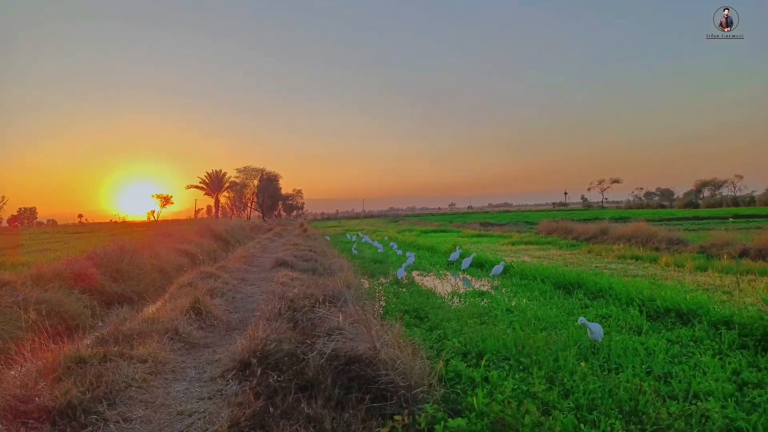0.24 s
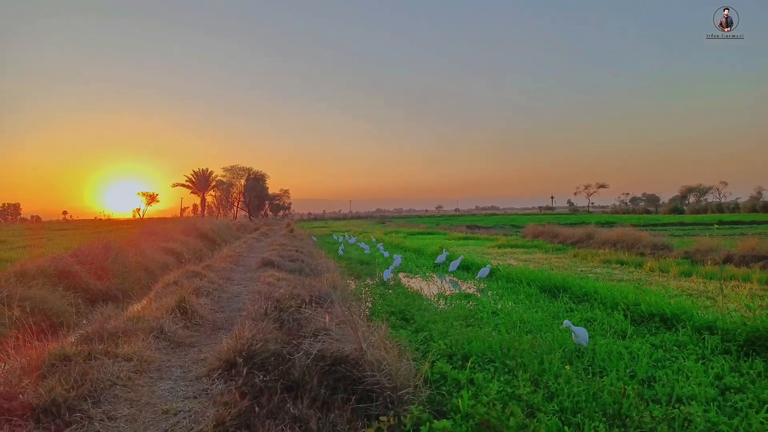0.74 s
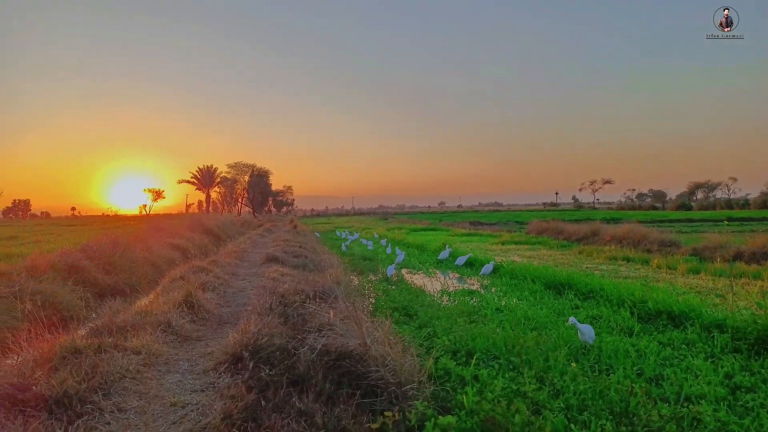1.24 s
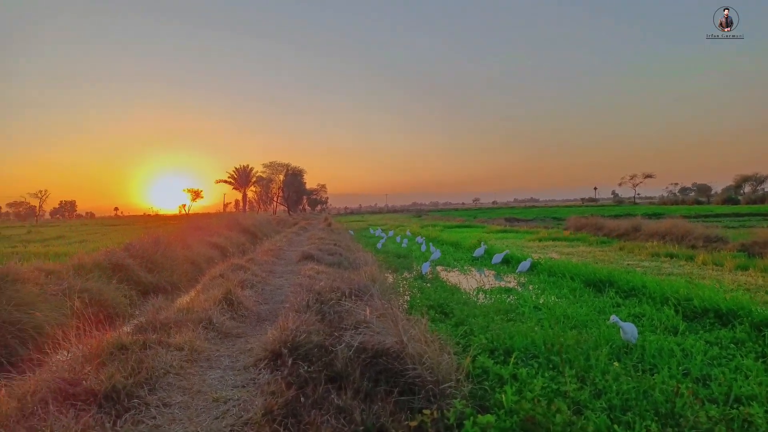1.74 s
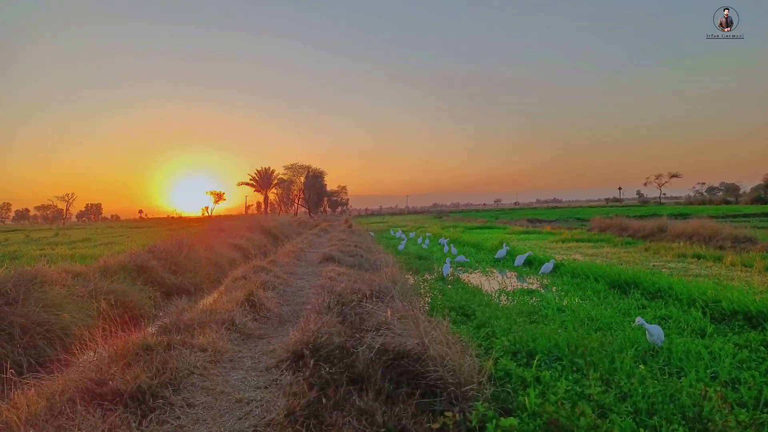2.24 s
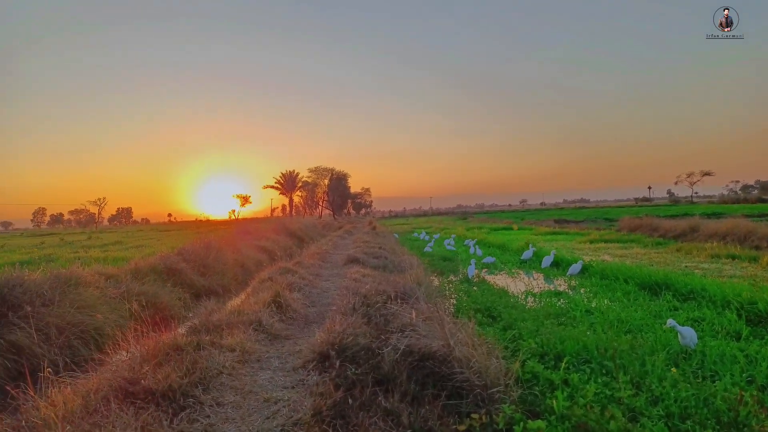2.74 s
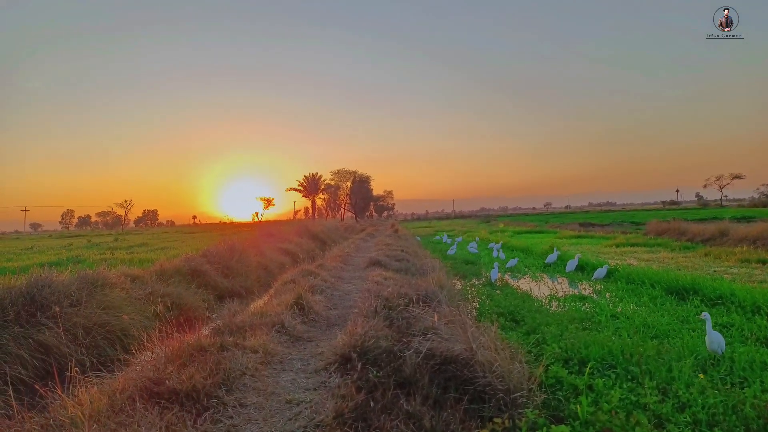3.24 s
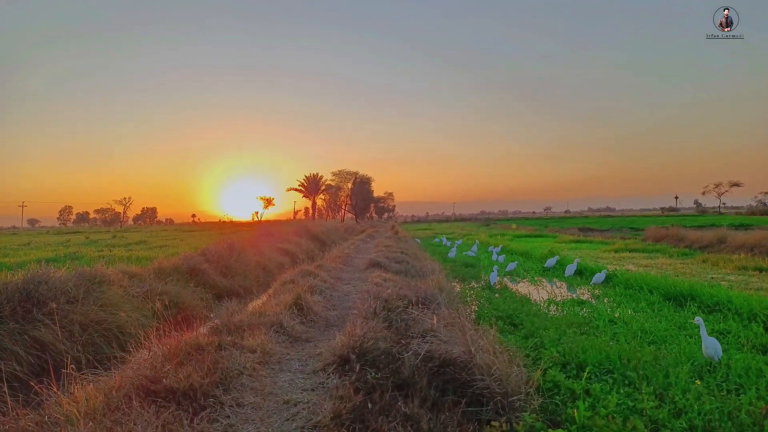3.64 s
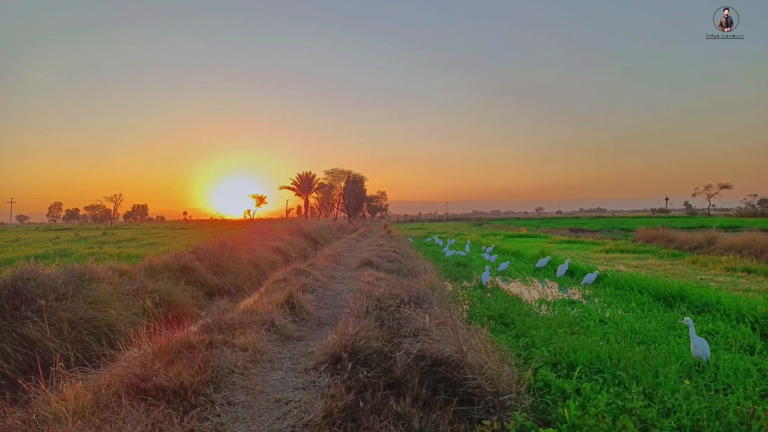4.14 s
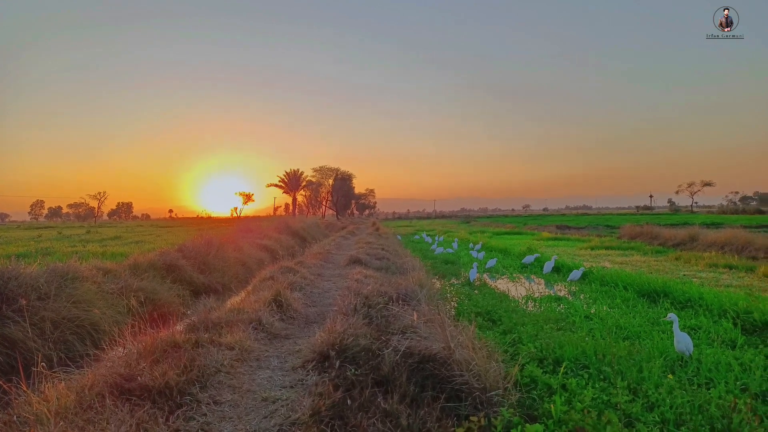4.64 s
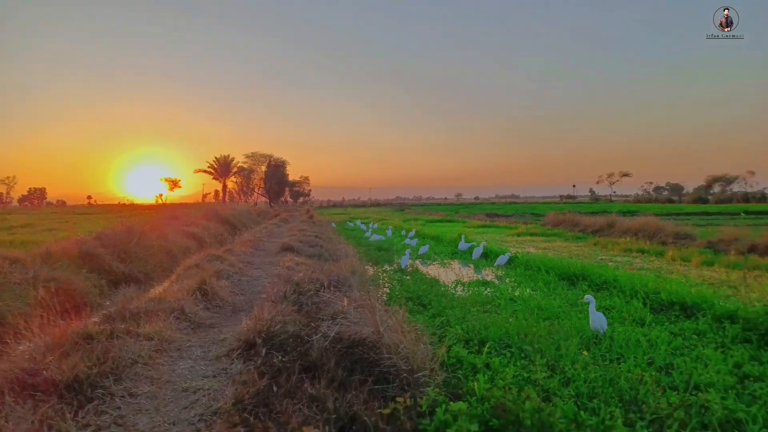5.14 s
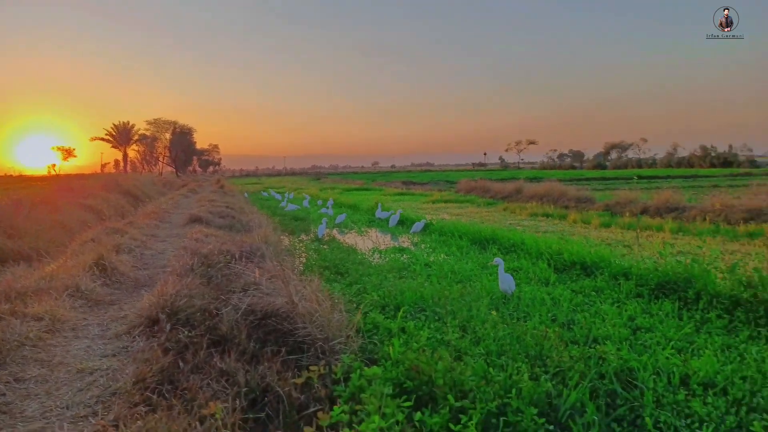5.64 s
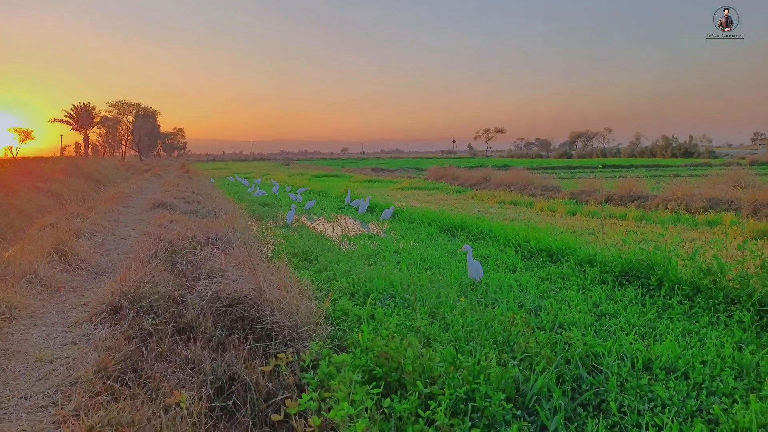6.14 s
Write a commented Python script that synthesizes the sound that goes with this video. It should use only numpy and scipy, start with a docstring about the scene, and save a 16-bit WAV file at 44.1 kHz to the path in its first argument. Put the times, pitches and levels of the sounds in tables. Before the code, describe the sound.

A single-cylinder diesel engine runs a water pump in open fields for about six and a half seconds, firing just under eight times a second. Each beat is a sharp, ringing exhaust chuff with a soft low thud and a short scatter off the ground. Loose metal rattles lightly in between. At about 1.1 seconds all sound drops out for an instant. Around 1.4 seconds the engine misfires once, comes back with a harder beat and a few small clanks, slows slightly and recovers by about 2.5 seconds. Throughout, a slightly faster engine thumps dully farther off, drifting in and out of step with the main beat, over a very faint outdoor rumble. From about 5.4 seconds a soft hiss with thin, high whistles rises between the beats, strongest near 5.8 seconds, while both engines keep going to the end.

```python
"""Open fields, where a single-cylinder diesel drives a water pump at just under eight firings a second.
Each firing is a sharp, ringing exhaust chuff with a short scatter off the ground and a low thud;
loose metal rattles in between. The recorder drops out for an instant, then the engine misfires once,
sags a little and picks up. A slightly faster engine thumps farther off, drifting through the beat.
Near the end a thin, whistling hiss comes up."""
import sys
import numpy as np
from scipy import signal
from scipy.fft import rfft, irfft
from scipy.io import wavfile

SR = 44100
rng = np.random.default_rng(int(sys.argv[2]) if len(sys.argv) > 2 else 0)


def store_wav(level_fs):
    """Save 16-bit WAV to argv[1]."""
    pcm = np.round(np.clip(np.atleast_2d(level_fs), -1, 1) * 32767)
    wavfile.write(sys.argv[1], SR, pcm.T.astype(np.int16))


N = 280917
TIME = np.arange(N) / SR
LEAD_S = .03  # a stroke's sound starts this long before its centre
AGE = np.arange(int(SR / 6)) / SR - LEAD_S  # seconds from the centre of a stroke
FREQ = np.abs(np.fft.fftfreq(4096, 1 / SR)) + 1
RUNNING = (TIME < 1.127) | (TIME > 1.1425)  # false while the recorder stalls

# Modes of the silencer and casing. Each row: pitch in Hz, relative level in dB, T60 in seconds.
CASING_MODES = [(1180, -28.5, 0.025), (1410, -9, 0.25), (1770, 1.5, 0.09), (1765, 6.5, 0.26),
                (1970, -2, 0.39), (2584, 1.5, 0.16), (3130, 4.5, 0.32), (3850, -8, 0.17), (5700, -4, 0.18),
                (6440, -18.5, 0.2), (7730, -28.5, 0.049), (8350, -38, 0.013)]


def pump_engine():
    """A chuff and a thud per firing; each chuff sits a little differently between left and right."""
    # Governed speed. Each row: time in seconds, firings per second.
    speed = [(0, 7.811), (1, 7.799), (1.4, 7.706), (2.4, 7.801), (4.3, 7.906), (5.2, 7.812), (6.37, 7.785)]
    # Drift of the exhaust note. Each row: time in seconds, level in dB, strongest ring in Hz,
    # extra body below 2 kHz in dB, extra edge above 4 kHz in dB.
    exhaust_note = [(0, -34, 2740, 19.5, 8.5), (.5, -34.5, 2650, 6.5, 2), (1.051, -33, 2740, 9, 6.5),
                    (2.002, -30, 2655, 6, 2), (2.5, -32.5, 2770, 5.5, 1.5), (3.148, -29, 2527, 5, -2),
                    (3.95, -28.5, 2546, 6, -3), (4.35, -32, 2640, 15, 0), (4.8, -33, 2620, 5.5, -2.5),
                    (5.1, -32, 2790, 0.5, 7), (5.5, -30, 2220, 8.5, 2.5), (6.37, -31.5, 2230, -0.5, 0)]
    # Hard and soft firings, one a misfire. Each row: time in seconds, accent in dB.
    odd_firings = [(.06, 7.5), (.32, 1.5), (.83, -4.5), (1.36, -24.5), (1.49, 8.5), (1.62, -4), (1.75, 2),
                   (2.01, 4), (2.27, 2.5), (4.18, 4), (4.56, 5.5), (4.94, -8), (5.2, 2.5), (5.33, -6),
                   (5.84, -6), (5.97, 2), (6.22, -6)]
    out = np.zeros((2, N))
    times, *drift = np.transpose(exhaust_note)
    for s in firings(speed, first_s=.0647):
        db, ring_hz, body_db, edge_db = (np.interp(s, times, column) for column in drift)
        chance = rng.standard_normal(7)  # no two firings burn alike
        extra_db = accent(s, odd_firings) + 1.32 * chance[0]
        db = db + extra_db
        exhaust = chuff(db, ring_hz * (1 + .029 * chance[1]),
                        body_db + 2 * chance[2], edge_db + 2 * chance[3],
                        spread_ms=2.185 * np.exp(.26 * chance[4] - .015 * extra_db),  # harder is shorter
                        tail_db=-39.5 + .6 * db + 4.5 * chance[5])  # partly follows the burst
        add(out, s, delay_left(exhaust, lag_ms=.12 + .05 * chance[6]))
        add(out, s, delay_left([thud()] * 2, lag_ms=.21))
    return out


def chuff(db, ring_hz, body_db, edge_db, spread_ms, tail_db):
    """Gas bursts from the exhaust in ragged spurts, rings the metal and scatters off banks and crops."""
    # Tone of the exhaust burst. Each row: frequency in Hz, gain in dB.
    burst_eq = [(450, -56), (900, -33), (1100, -33), (1300, -12), (1550, -24.5), (1750, -1.5), (2620, 4.5),
                (3950, -0.5), (4350, -5.5), (4850, -2.5), (6000, -12), (6900, -28), (8400, -48),
                (9200, -67)]
    # Tone of the ground echoes. Each row: frequency in Hz, gain in dB.
    ground_eq = [(450, -30), (900, -19), (1300, -14), (1800, 4), (2200, -3.5), (2600, 9), (3000, -8),
                 (3900, -0.5), (5500, -16), (6500, -20), (8000, -41), (9000, -67.5)]
    progress = 1000 * AGE / spread_ms
    valve = np.where(progress > -2.1, 1, .3)  # a faint leak, then it cracks open
    gust = valve * (np.exp(-(progress / 2.2) ** 2) + .13 * swell(rise_s=.0042, fall_s=.0052))
    gas = noise(apart=.017) * gust * undb(2 * walk(rate=2200, size=len(AGE)))
    shelves = np.interp(FREQ, [1900, 2400, 3800, 4500], [body_db, 0, 0, edge_db])
    # One strong ring, with random peaks and notches that change at each chuff.
    peaks = 8 / (1 + ((FREQ - ring_hz) / 110) ** 2) + 3.4 * ripple(step_hz=170)
    burst = level(colour(gas, spectrum(burst_eq) + shelves + peaks), db, span_s=.0075)
    metal = level(casing_ring(gas), tail_db - 1, span_s=.03)
    # Nearby ground returns grainy echoes within about 50 ms.
    cutoff = 1 / (1 + np.exp((AGE - .046) / .0027))
    echoes = noise(apart=.88) * swell(rise_s=.0056, fall_s=.048) * cutoff
    echoes *= undb(3.5 * walk(rate=300, size=len(AGE)))
    ground = spectrum(ground_eq) + 3 * ripple(step_hz=220)
    return burst + metal + level(colour(echoes, ground), tail_db + 1, span_s=.05)


def casing_ring(push, scatter_db=4, detune=.012):
    """The metal rings in its modes, struck a little differently each time."""
    hz, db, t60 = np.transpose(CASING_MODES)[:, :, None]
    chance = rng.standard_normal((2, len(hz), 1))
    modes = undb(db + scatter_db * chance[0]) * mode(hz * (1 + detune * chance[1]), t60)
    return ring(push, modes.sum(axis=0))


def thud():
    """The firing kicks the block, the exhaust slug follows, and the valve gear knocks just after."""
    chance = rng.standard_normal(6)
    kick = undb(-56.5 + 1.3 * chance[0]) * throb(235 * (1 + .033 * chance[1]), .002, delay_s=-.0036)
    slug = undb(-60 + .45 * chance[2]) * throb(hz=82, width_s=.011, delay_s=.0096)
    knock_s = .037 + .0022 * chance[5]
    knock = undb(-63 + 2 * chance[3]) * throb(262 * (1 + .06 * chance[4]), .0053, knock_s)
    return kick + slug + knock


def rattle(taps_per_s=70, scatter_db=8):
    """Shaken metal: small random taps on each casing mode, and a few louder clanks and knocks."""
    # Clanks and knocks. Each row: time in seconds, pitch in Hz, level in dB. Most are loose parts; the one at
    # 1.403 s is a louder clack of the far engine, the one at 4.095 s a late knock of the near engine's valve.
    clanks = [(1.403, 2510, -53.5), (1.444, 1670, -55), (1.49, 1077, -48), (1.949, 1750, -50),
              (2.168, 2630, -52.5), (2.462, 1630, -59.5), (2.562, 1650, -58.5), (4.095, 1650, -57.5)]
    out = np.zeros((2, N))
    for hz, db, _ in CASING_MODES:
        taps = (rng.random((2, N)) < taps_per_s / SR) * undb(scatter_db * rng.standard_normal(N))
        out += undb(db) * ring(taps, mode(hz, t60=.036))
    out = level(out, db=-73, span_s=N / SR)
    for s, hz, db in clanks:
        add(out, s, clank(hz, db))
    return out


def clank(hz, db):
    """A loose part touches down softly, chatters and rings for a moment."""
    chatter = 1 + 1.5 * walk(rate=1400, size=len(AGE))
    tap = np.exp(-(AGE / .003) ** 2) * np.cos(2 * np.pi * hz * AGE) * chatter
    return level(ring(tap, mode(hz, t60=.061))[0], db, span_s=.015)


def far_engine(clack_lead_s=.007):
    """Distance leaves a dull clack with the deep thump of the exhaust just behind it."""
    # Engine speed. Each row: time in seconds, firings per second.
    speed = [(0, 9.254), (1.5, 9.148), (3.8, 9.134), (5.4, 8.975), (6.37, 9.037)]
    # Heavy strokes. Each row: time in seconds, extra thump in dB.
    heavy_thumps = [(.21, 9.5), (1.63, 6), (2.29, 3.5), (3.71, 5), (5.48, 6), (5.59, 6), (6.26, 3.5)]
    # Tone of the clack. Each row: frequency in Hz, gain in dB.
    clack_eq = [(450, -25.5), (900, -10), (1150, -10.5), (1500, 9), (1900, 8.5), (2150, -19), (2550, 8.5),
                (2900, -10.5), (3750, -10), (4300, -15), (7000, -22), (8200, -63)]
    out = np.zeros((2, N))
    for s in firings(speed, first_s=.0934):
        chance = rng.standard_normal(3)
        thump_db = -53 + accent(s, heavy_thumps) + .44 * chance[1]
        thump = throb(hz=90 * (1 + .068 * chance[0]), width_s=.0071)
        thump -= .29 * throb(hz=152.6, width_s=.0096)  # the pipe's second resonance sharpens the crests
        add(out, s, delay_left([undb(thump_db) * thump] * 2, lag_ms=.3))
        push = noise(apart=.57) * swell(rise_s=.002, fall_s=.0055)
        tone = spectrum(clack_eq) + 4 * ripple(step_hz=200)
        clack = level(colour(push, tone), db=-56.5 + 2.5 * chance[2], span_s=.012)
        add(out, s - clack_lead_s, delay_left(clack, lag_ms=.15))
    return out


def whistling_hiss():
    """A soft hiss with thin, mostly sinking whistles fills the gaps between the last beats."""
    # Tone of the hiss. Each row: frequency in Hz, gain in dB.
    hiss_eq = [(1200, -21.5), (1800, 1.5), (2150, 10.5), (2700, -20), (3350, -3), (3900, -4), (4400, -5),
               (4900, -20.5), (5400, -8), (6200, -20.5), (7100, -19.5), (8500, -42.5), (15000, -50)]
    # Its fader curve. Each row: time in seconds, level in dB.
    fader = [(0, -90.5), (2.4, -107.5), (3.4, -94), (4.5, -89), (5.3, -84.5), (5.45, -73.5), (5.8, -59.5),
             (6.05, -63.5), (6.37, -69.5)]
    # Whistles. Each row: start and end in seconds, first and last pitch in Hz, relative level in dB.
    whistles = [(5.4, 5.721, 5400, 5300, -56), (5.449, 5.832, 3240, 3460, -60),
                (5.515, 5.794, 2240, 2050, -74), (5.677, 6.067, 6250, 6300, -73),
                (5.744, 6.369, 2200, 1967, -64), (5.996, 6.318, 6230, 6150, -60.5),
                (5.957, 6.316, 3670, 3400, -71)]
    out = level(colour(noise(apart=.82, size=N), spectrum(hiss_eq)), db=0, span_s=N / SR)
    out *= undb(np.interp(TIME, *np.transpose(fader)) + 4.3 * walk(rate=19))
    for start, end, from_hz, to_hz, db in whistles:
        along = np.clip((TIME - start) / (end - start), 0, 1)
        phase = 2 * np.pi * np.cumsum(from_hz + (to_hz - from_hz) * along) / SR
        arch = np.sqrt(np.abs(np.sin(np.pi * along)))
        # An unsteady tone, a couple of hundred hertz wide.
        tone = np.array([walk(260) * np.cos(phase) + walk(260) * np.sin(phase) for _ in range(2)])
        out += undb(db) * arch * tone / 2.5
    return out


def field_air():
    """Low rumble, alike on both sides, under a faint wavering wash from the open land."""
    # Tone of the ambience. Each row: frequency in Hz, gain in dB.
    air_eq = [(25, -16.5), (70, -7.5), (110, 8.5), (200, -5.5), (270, -3), (430, -29), (750, -10.5),
              (1100, -14), (1750, -15.5), (2200, -29), (3400, -21), (6000, -34), (8500, -47), (15000, -35)]
    rumble = signal.sosfilt(signal.butter(2, 450, fs=SR, output="sos"), noise(apart=.056, size=N))
    wash = signal.sosfilt(signal.butter(2, 450, "high", fs=SR, output="sos"), noise(apart=1, size=N))
    air = rumble * undb(4 * walk(rate=17)) + wash * undb(2 * walk(rate=15))
    return level(colour(air, spectrum(air_eq)), db=-70.5, span_s=N / SR)


def firings(speed, first_s):
    """Times at which an engine completes each cycle; the count pauses during the dropout."""
    cycles = np.cumsum(np.interp(TIME, *np.transpose(speed)) * RUNNING) / SR
    first_cycle = np.interp(first_s, TIME, cycles)
    return np.interp(np.arange(first_cycle, cycles[-1]), cycles, TIME)


def accent(s, table):
    """Extra dB for the stroke at time s, if the table lists one."""
    return sum(db for when, db in table if abs(when - s) < .05)


def throb(hz, width_s, delay_s=0):
    """A pressure wave only a few cycles long."""
    t = AGE - delay_s
    return -np.cos(2 * np.pi * hz * t) * np.exp(-(t / width_s) ** 2 / 2)


def swell(rise_s, fall_s):
    """Envelope that grows into the centre of the stroke and dies away after it."""
    return np.exp(np.minimum(AGE / rise_s, -AGE / fall_s))


def mode(hz, t60):
    """One resonance, dying by 60 dB in t60 seconds."""
    t = AGE + LEAD_S
    return np.sin(2 * np.pi * hz * t) * np.exp(-np.log(1000) * t / t60)


def ring(push, response):
    """Sound a push through an impulse response."""
    return signal.fftconvolve(np.atleast_2d(push), response[None], axes=-1)[:, :push.shape[-1]]


def noise(apart, size=len(AGE)):
    """Stereo noise; apart is the share of power that the sides do not have in common."""
    white = rng.standard_normal((3, size))
    return np.sqrt(1 - apart) * white[0] + np.sqrt(apart) * white[1:]


def walk(rate, size=N):
    """A random wander that turns rate times a second."""
    knots = rng.standard_normal(4096)
    return .93 * np.interp(np.arange(size) / SR * rate, np.arange(len(knots)), knots)


def ripple(step_hz):
    """Random peaks and notches across the spectrum."""
    knots = rng.standard_normal(512)
    return 1.135 * np.interp(FREQ / step_hz, np.arange(len(knots)), knots)


def spectrum(points):
    """Join (Hz, dB) points into an EQ curve on a log-frequency axis."""
    hz, db = np.transpose(points)
    return np.interp(np.log(FREQ), np.log(hz), db)


def colour(x, db):
    """Apply an EQ curve as a minimum-phase filter."""
    log_gain = np.conj(signal.hilbert(np.log(undb(db))))
    response = np.fft.ifft(np.exp(log_gain)).real[:len(FREQ) // 2]
    return ring(x, response)


def undb(db):
    """Decibels to gain."""
    return 10 ** (np.asarray(db) / 20)


def level(x, db, span_s):
    """Scale a sound so that its energy, spread over span_s, has this rms level."""
    return x * undb(db) * np.sqrt(span_s * SR / np.sum(x ** 2, axis=-1, keepdims=True))


def delay_left(x, lag_ms):
    """Shift the left side of a stroke slightly against the right."""
    shift = np.exp(-2j * np.pi * np.fft.rfftfreq(len(AGE), 1 / SR) * lag_ms / 1000)
    return np.array([irfft(rfft(x[0]) * shift, len(AGE)), x[1]])


def add(out, s, sound):
    """Mix one stroke in with its centre at time s."""
    start = int((s - LEAD_S) * SR)
    a, b = max(start, 0), min(start + sound.shape[-1], N)
    if b > a:
        out[:, a:b] += sound[..., a - start:b - start]


def scene():
    """Both engines over the open field."""
    return pump_engine() + rattle() + far_engine() + field_air() + whistling_hiss()


def record(dry, top_hz=15400):
    """Each microphone port colours its side; the recorder mutes while it stalls, and cuts the top."""
    # The ports resonate at different pitches. Each row: frequency in Hz, left minus right in dB.
    port_balance = [(300, 1.5), (1000, 1), (1320, 14.5), (1750, 16), (2060, -10), (2450, 0.5), (2650, 13),
                    (3040, -7.5), (3550, 6.5), (4150, -9), (4650, 15.5), (5200, -6.5), (5650, 10),
                    (6450, 1), (7800, -5.5), (10000, 3)]
    ratio = undb(spectrum(port_balance)) ** 2
    shares = 2 * np.array([ratio, np.ones_like(ratio)]) / (1 + ratio)
    heard = np.vstack([colour(side[None], 10 * np.log10(share)) for side, share in zip(dry, shares)])
    return signal.sosfilt(signal.ellip(8, .2, 70, top_hz, fs=SR, output="sos"), heard * RUNNING)


dry = scene()
out = record(dry)
store_wav(out)
```